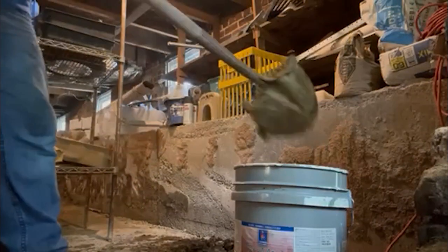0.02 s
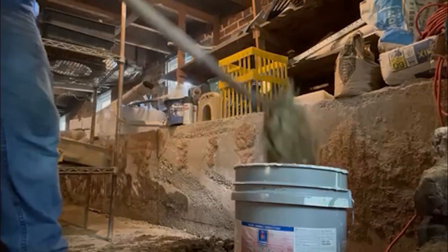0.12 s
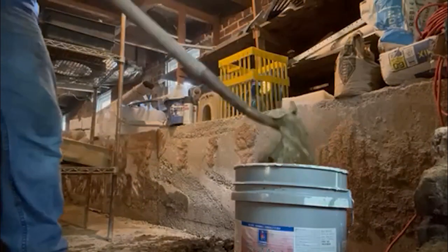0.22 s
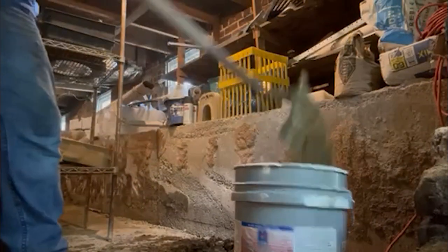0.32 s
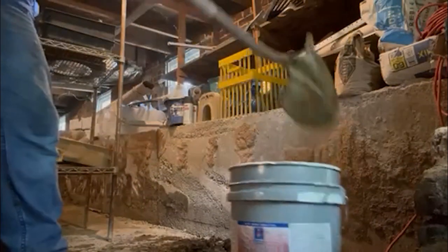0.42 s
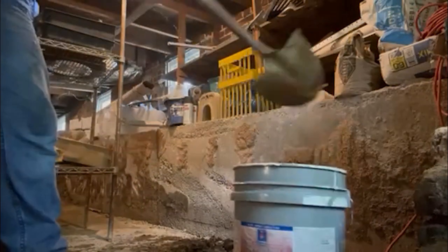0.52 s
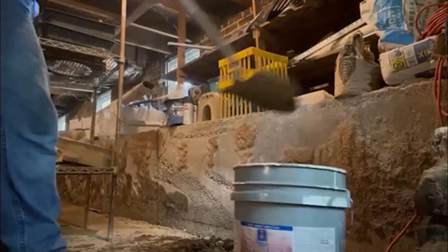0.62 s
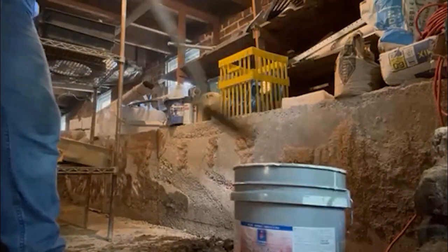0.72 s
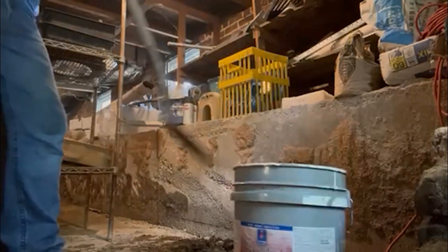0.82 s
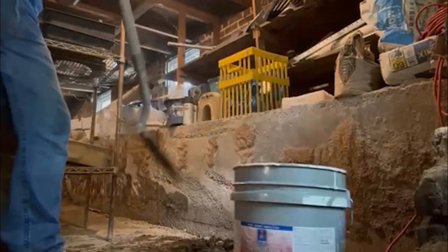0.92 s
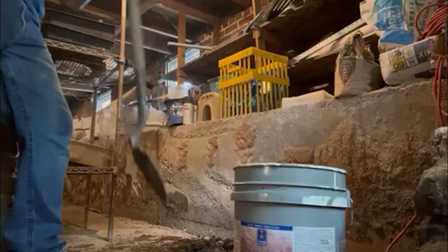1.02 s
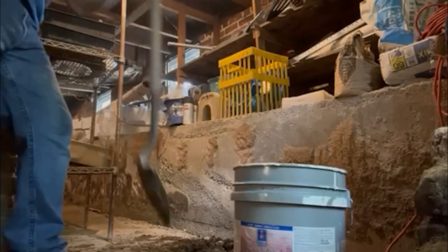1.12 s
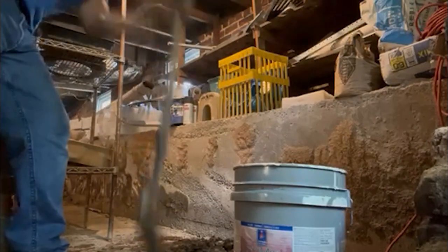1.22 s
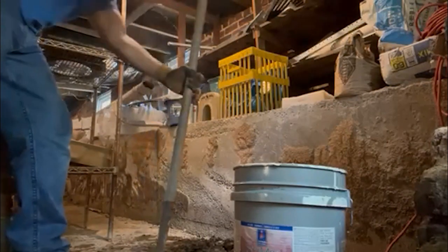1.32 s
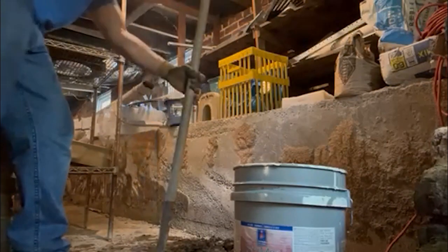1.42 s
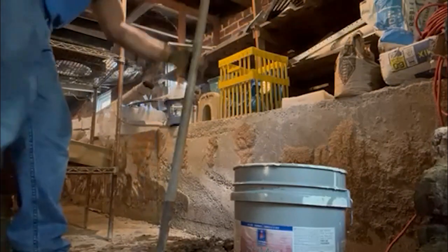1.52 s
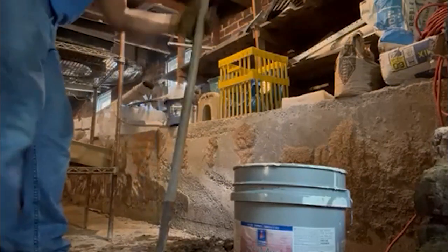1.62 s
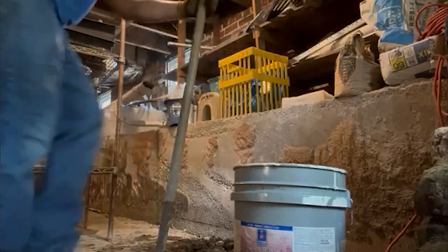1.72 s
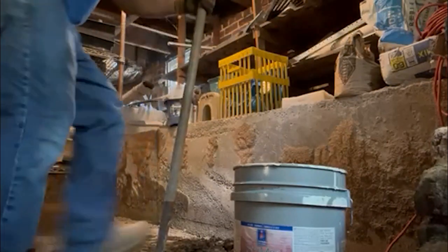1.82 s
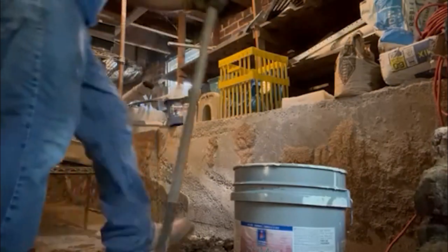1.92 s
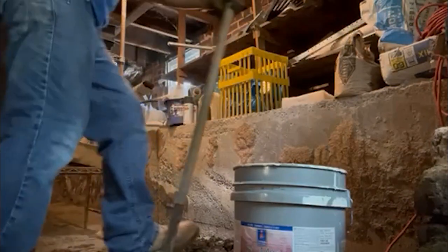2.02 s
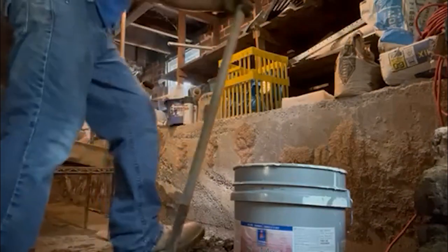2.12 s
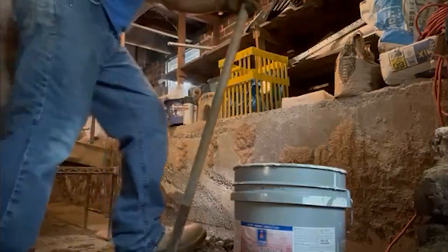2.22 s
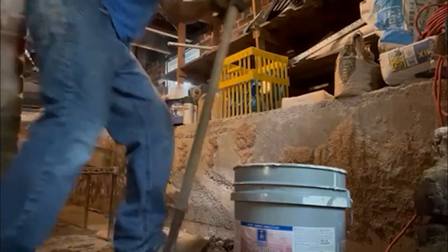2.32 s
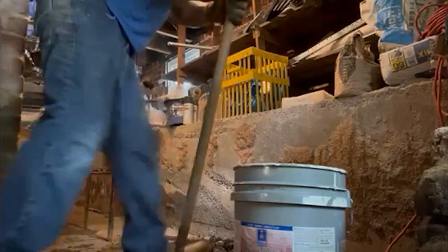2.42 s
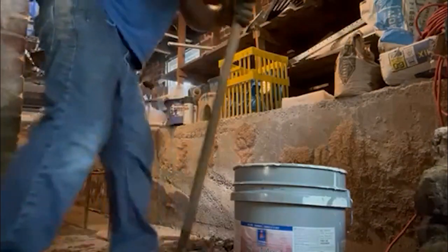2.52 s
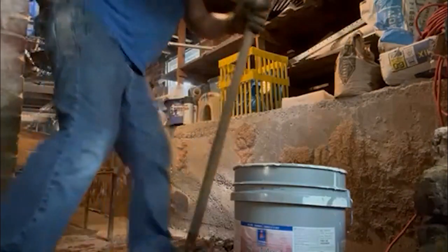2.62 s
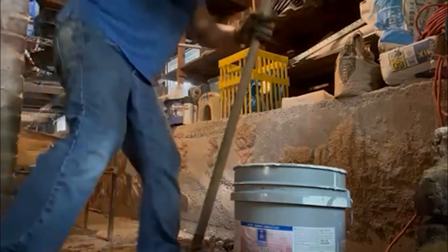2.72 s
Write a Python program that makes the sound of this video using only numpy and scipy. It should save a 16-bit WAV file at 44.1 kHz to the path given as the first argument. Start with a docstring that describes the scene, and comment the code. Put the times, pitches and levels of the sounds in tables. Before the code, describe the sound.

Rubble falls into a plastic pail: after faint ticks, a dense, loud, hollow tumble at 0.23-0.35 s, gravel trickling, and a last soft thump at 0.53. Near quiet until 1.26, when a shovel blade stabs dirt with a sharp stony crunch. Faint boot thuds at 1.63 and 1.89; gritty scraping and knocks from 2.27, a short hard crunch at 2.46, then fading crumbs. Close, short basement reverberation, faint low hum.

```python
"""Rubble into a pail

Basement with a dirt floor, two close microphone ports. A shovelful of rubble drops into a plastic pail,
heard as dying modes of its air and wall; the steel blade is stabbed into the floor, boots step up and
push it through gravel: short detuned rings for thuds and knocks, random ticks for grit, small clacks
for gravel. Scattered reflections give the room; shaped noise gives its air and a low wavering hum."""
import sys
import numpy as np
from scipy import signal
from scipy.fft import rfft, irfft, next_fast_len
from scipy.io import wavfile
from scipy.ndimage import uniform_filter1d

SR = 44100
rng = np.random.default_rng(int(sys.argv[2]) if len(sys.argv) > 2 else 0)


def attenuation_scalar(level_db):
    """Turn a level in dB into a linear amplitude multiplier (20 dB per decade)."""
    decades = np.asarray(level_db, float) / 20
    return 10 ** decades


def persist_wave(psi):
    """Save psi, clipped to +-1, as 16-bit WAV."""
    counts = np.round(np.clip(psi, -1, 1) * 32767).astype(np.int16)
    wavfile.write(sys.argv[1], SR, np.atleast_2d(counts).T)


N = 121275  # samples

# Lumps landing in the pail: t/s, relative level/dB, hardness/0-1
LUMPS = [(.234, -8.5, 0.71), (.243, -3.5, 0.64), (.254, -1, 0.4), (.268, -2.5, .6), (.288, -6.5, 0.7),
         (.308, -2, 0.45), (.323, -4, 0.5), (0.349, -14, 0), (.383, -24.5, 0.81), (.519, -14.5, 0.31),
         (0.532, -9.5, 0)]
# Modes of the pail, its air first, then its wall: f/Hz, relative level/dB, t60/s
PAIL_MODES = [(215.5, -6.5, 0.38), (208.3, 0, 0.063), (272, -6.5, 0.091), (407.3, -10, 0.051),
              (665, -15, 0.078), (962, -25.5, 0.1), (1900, -12, 0.034)]
# Dull blows of blade and boots on the dirt floor: t/s, main mode level/dB, f/Hz, t60/s
THUDS = [(.155, -22, 121, 0.091), (1.262, -22, 248, 0.051), (1.272, -15, 79.4, 0.23),
         (1.625, -24.5, 186.4, 0.073), (1.647, -28, 178, 0.035), (1.665, -34, 70.5, 0.24),
         (1.886, -22, 218.4, 0.12), (1.892, -15.5, 109, 0.071), (2.461, -13.5, 167, 0.079),
         (2.484, -17.5, 192, 0.13)]
# Stones knocking the blade or each other: t/s, main mode level/dB, f/Hz
KNOCKS = [(.022, -29, 957), (.023, -32.5, 467), (0.121, -43, 990), (0.191, -41, 1040), (.243, -9.5, 741),
          (.447, -35, 630), (1.259, -17, 713), (1.273, -11, 847), (1.275, -13.5, 3370), (1.643, -40.5, 483),
          (1.932, -36, 1056), (2.272, -30.5, 633), (2.284, -28.5, 1820), (2.308, -26.5, 643),
          (2.35, -15, 1000), (2.36, -14.5, 621), (2.401, -26, 701), (2.463, -23.5, 1905),
          (2.461, -26.5, 924), (2.462, -22, 478), (2.611, -39.5, 1780), (2.677, -38.5, 603)]
# Loose material jolted by a blow, sudden and dying: t/s, fine grit level/dB, coarse gravel level/dB, t60/s
SPILLS = [(0.018, -65, -33, 0.17), (0.04, -38.5, -53, 0.046), (0.144, -59, -37, 0.24),
          (0.249, -39, -21, 0.48), (0.517, -55, -46.5, 0.7), (1.258, -27.5, -14, 0.11),
          (1.273, -17, -29, 0.13), (1.627, -58, -52.5, 0.45), (1.748, -83, -40.5, 0.07),
          (1.883, -55.5, -37, 0.25), (2.24, -41, -37.5, 0.31), (2.312, -35.5, -38, 0.17),
          (2.332, -24, -29.5, 0.2), (2.458, -52, -11, 0.039)]
# Loose material dragged or pouring, swelling and fading:
# start t/s, length/s, fine grit level/dB, coarse gravel level/dB
DRAGS = [(0.119, 0.17, -55.5, -42), (0.302, 0.44, -90, -55.5), (.9, .18, -60, -73.5),
         (1.882, .14, -57, -49.5), (2.015, 0.3, -67, -62), (1.233, 0.096, -55.5, -43.5),
         (2.275, 0.2, -40, -29.5), (2.394, 0.41, -52.5, -43.5), (2.644, 0.067, -50, -40.5)]
# Colour of the fine grit: f/Hz, relative level/dB
GRIT_COLOUR = [(1000, -5), (1800, -1), (4500, -7.5), (8500, -6.5), (11500, -11)]
# Colour of the coarse gravel, by pitch of stone: f/Hz, relative level/dB
GRAVEL_COLOUR = [(200, -3.5), (600, 6), (1100, -0.5), (2000, -8.5), (3000, -19.5), (6000, -32)]
# Colour of the basement air: f/Hz, relative level/dB
AIR_COLOUR = [(25, -8.5), (120, -6.5), (185, -20), (260, -16.5), (470, -32), (1290, -41), (4280, -47),
              (11500, -51.5)]
# Decay of the room: f/Hz, t60/s
ROOM_DECAY = [(100, 0.29), (9000, 0.22)]
# Likeness of the two channels: f/Hz, likeness/0-1
LIKENESS = [(250, 0.98), (600, 0.098), (1500, .58), (4000, 0.35), (6200, 0.62)]
# Phase between the microphone ports: f/Hz, left lead/rad
PORT_PHASE = [(7500, 0), (8100, .6), (8900, np.pi), (9800, np.pi), (10800, 2 * np.pi)]
# Balance of the microphone ports: f/Hz, left minus right/dB
PORT_BALANCE = [(150, 2), (600, -3.5), (2500, 1)]

PAIL_DB, WALL_SCATTER = -6, 0.082  # scatter: relative pitch spread of the wall modes
CHOKE_DB_PER_S = 354.5  # extra decay of a ring once the next lump has landed
KNOCK_T60_CYCLES, STONE_T60_CYCLES = 45, 16.4
THUD_RISE_CYCLES = 0.26  # how slowly soft dirt takes a blow
SPILL_RISE_S = 0.0055
CRUMBLE_DB, CRUMBLE_T60_S = -16, 0.087  # gravel shed by a lump of hardness 0.5, relative to the lump
CLUMP_DB, CLUMP_S = 1.5, 0.01  # rms unevenness of the gravel, length of its smoothing
GRIT_PER_S, GRIT_SPREAD_DB = 8000, 1  # per channel
GRAVEL_PER_S, GRAVEL_SPREAD_DB = 1500, 2.5
ROOM_DB, AIR_DB = -9, -48.5
HUM_HZ, HUM_WIDTH_HZ, HUM_DB = 106, 16, -49.5
TWIN_HZ = 7000  # above this the two channels are alike
OVERLOAD = 1.1  # full-scale units; the input stage rounds off peaks near this level
LOW_CUT_HZ, TOP_HZ = 57.4, 11750
BASS_LAG_S, LAG_SLOPE = 0.005, 0.88  # delay at 200 Hz, exponent of its growth towards the bass


def pail():
    """The air in the pail rings alike for every lump; wall modes change with the spot; soft lumps lose the top."""
    out = np.zeros(N)
    t = np.arange(SR // 2) / SR
    spots = rng.standard_normal((len(LUMPS), len(PAIL_MODES), 2))
    spots[:, :2] = 0  # the two air modes stay put
    gaps = np.diff([row[0] for row in LUMPS] + [N / SR])
    for (s, db, hard), spot, gap in zip(LUMPS, spots, gaps):
        choke = attenuation_scalar(-CHOKE_DB_PER_S * np.maximum(t - gap, 0))
        for (hz, mode_db, t60), (level_shift, pitch_shift) in zip(PAIL_MODES, spot):
            hardness_db = 12 * (hard - 0.5) * np.log2(hz / PAIL_MODES[0][0])
            level_db = db + PAIL_DB + mode_db + hardness_db + 3 * level_shift
            add(out, s, choke * ring(hz * (1 + WALL_SCATTER * pitch_shift), level_db, t60))
    return coloured(out, lambda hz: 1 / (1 + (140 / (hz + 1)) ** 4))


def thuds():
    """Blade and boots strike the dirt floor, whose softness rounds the attack."""
    return blows(THUDS, smear=0.26, rise_cycles=THUD_RISE_CYCLES)


def knocks():
    """Stones knock with a sharp attack and ring for a fixed number of cycles."""
    table = [(s, db, hz, KNOCK_T60_CYCLES / hz) for s, db, hz in KNOCKS]
    return blows(table, smear=0.17)


def blows(table, smear, rise_cycles=0):
    """Short rings, each a main mode with two weaker, faster-dying detuned neighbours."""
    out = np.zeros(N)
    t = np.arange(SR // 2) / SR
    detunings = rng.uniform(0.62, 1, (len(table), 2))
    for (s, db, hz, t60), (up, down) in zip(table, detunings):
        modes = ring(hz, db, t60)
        modes += ring(hz * (1 + smear * up), db - 9, t60 / 2)
        modes += ring(hz * (1 - smear * down), db - 10.5, t60 / 2)
        rise = np.minimum(t * hz / max(rise_cycles, 1 / SR), 1)
        add(out, s, modes * np.sin(np.pi / 2 * rise) ** 2)
    return out


def slide():
    """Fine grit hisses along the blade, coarse gravel crunches."""
    fine, coarse = motion()
    grit = grains(GRIT_PER_S, GRIT_SPREAD_DB, GRIT_COLOUR)
    gravel = stones()
    hiss = fine * grit / band_rms(grit, 3000, 8500)
    crunch = coarse * gravel / band_rms(gravel, 500, 2500)
    return hiss + crunch


def motion():
    """Strength of grit and gravel over time: powers of spills, drags and crumbling lumps add up."""
    t, power = np.arange(N) / SR, np.zeros((2, N))
    for s, grit_db, gravel_db, t60 in SPILLS:
        since = np.maximum(t - s, 0)
        decay = attenuation_scalar(np.array([[grit_db], [gravel_db]]) - 60 * since / t60)
        power += (decay * np.minimum(since / SPILL_RISE_S, 1)) ** 2
    for s, length, grit_db, gravel_db in DRAGS:
        swell = np.sin(np.pi * np.clip((t - s) / length, 0, 1))
        power += (attenuation_scalar(np.array([[grit_db], [gravel_db]])) * swell) ** 2
    for s, db, hard in LUMPS:  # hard lumps shed the most gravel
        decay = attenuation_scalar(db + CRUMBLE_DB - 60 * np.maximum(t - s, 0) / CRUMBLE_T60_S)
        power[1] += (t > s) * (2 * hard * decay) ** 2
    clumps = evened(uniform_filter1d(rng.standard_normal(N), round(CLUMP_S * SR)))
    return np.sqrt(power) * attenuation_scalar(CLUMP_DB * clumps * np.array([[0.8], [1]]))  # grit clumps less


def grains(per_s, spread_db, spectrum):
    """Random ticks of uneven size with the given colour, scattered left and right."""
    size = attenuation_scalar(spread_db * np.minimum(rng.exponential(1, (2, N)), 5))
    size = size * rng.choice([-1., 1.], (2, N))
    ticks = paired(*(size * (rng.random((2, N)) < per_s / SR)))
    return coloured(ticks, lambda hz: attenuation_scalar(read(spectrum, hz)))


def stones(count=24):
    """Each stone gives a short clack at one of count pitches, left or right."""
    size = attenuation_scalar(GRAVEL_SPREAD_DB * np.minimum(rng.exponential(1, (2, N)), 4))
    size = size * (rng.random((2, N)) < GRAVEL_PER_S / SR)
    kind, out = rng.integers(0, count, (2, N)), np.zeros((2, N))
    for k, hz in enumerate(np.geomspace(GRAVEL_COLOUR[0][0], GRAVEL_COLOUR[-1][0], count)):
        clack = ring(hz, read(GRAVEL_COLOUR, hz), STONE_T60_CYCLES / hz)[:4096]
        out += signal.oaconvolve(size * (kind == k), clack[None] * hz, axes=1)[:, :N]
    return paired(*out)


def room(x):
    """Scattered reflections, each band dying at its own speed."""
    taps = np.zeros((2, SR // 2))
    starts = np.arange(200, SR // 2 - 20, 20)  # one reflection in every 20 samples
    at = starts + rng.integers(0, 20, (2, len(starts)))
    np.put_along_axis(taps, at, rng.choice([-1., 1.], at.shape), 1)
    hz, t, bands = signal.stft(taps, SR, nperseg=256)
    decay = attenuation_scalar(-60 * t / read(ROOM_DECAY, hz)[:, None])
    tail = signal.istft(bands * decay, SR, nperseg=256)[1]
    tail = tail / np.linalg.norm(tail[0])
    return paired(*signal.fftconvolve(x[None], tail, axes=1)[:, :N])


def basement_air():
    """A soft broadband floor, and a wavering hum made of narrow-band noise, equal in both channels."""
    a, b, c = rng.standard_normal((3, N))
    hum = coloured(c, lambda hz: 1 / (1 + (2 * (hz - HUM_HZ) / HUM_WIDTH_HZ) ** 2))
    air = coloured(paired(a, b), lambda hz: attenuation_scalar(read(AIR_COLOUR, hz)))
    return attenuation_scalar(AIR_DB) * evened(air) + attenuation_scalar(HUM_DB) * evened(hum)


def ring(hz, db, t60):
    """One dying mode, half a second long; t60 is at least 10 ms."""
    t = np.arange(SR // 2) / SR
    return attenuation_scalar(db - 60 * t / max(t60, 0.01)) * np.sin(2 * np.pi * hz * t)


def paired(a, b):
    """Two channels that are alike in the bass and the top treble and differ between."""
    def like(hz):
        return np.where(hz > TWIN_HZ, 1, np.clip(read(LIKENESS, hz), 0, 1))

    right = coloured(a, like) + coloured(b, lambda hz: np.sqrt(1 - like(hz) ** 2))
    return np.array([a, right])


def add(mix, s, sound):
    """Mixes a sound in at a time in seconds."""
    part = mix[round(s * SR):][:len(sound)]
    part += sound[:len(part)]


def evened(x):
    """Scales to rms 1."""
    return x / np.sqrt(np.mean(x ** 2) + 1e-20)


def read(points, hz):
    """Reads a table on a log-frequency axis."""
    f, value = np.transpose(points)
    return np.interp(np.log(hz + 1), np.log(f + 1), value)


def coloured(x, gain):
    """Filters by a complex gain given as a function of Hz."""
    size = next_fast_len(N + 8192)
    return irfft(rfft(x, size) * gain(np.fft.rfftfreq(size, 1 / SR)), size)[..., :N]


def band_rms(x, lo_hz, hi_hz):
    """Level inside a band."""
    return np.std(coloured(x, lambda hz: (hz > lo_hz) & (hz < hi_hz)))


def scene():
    """All sources in the basement; blows in the centre, loose material spread wide."""
    struck = pail() + thuds() + knocks()
    loose = slide()
    reflections = attenuation_scalar(ROOM_DB) * room(struck + loose[0])
    return struck + loose + reflections + basement_air()


def band_limit(x):
    """A steep low-pass at the top of the band."""
    return signal.sosfilt(signal.butter(12, 12870, fs=SR, output="sos"), x)


def record(dry):
    """Soft overload and band limits; the bass arrives late; the two ports differ in phase and level."""
    side = np.array([[0.5], [-0.5]])  # each port takes half of the difference

    def lag(hz):  # phase in rad, the integral of the delay over frequency
        power = 1 - LAG_SLOPE
        return 2 * np.pi * BASS_LAG_S * 200 * (hz / 200) ** power / power

    def ports(hz):
        low_cut = 1 / np.sqrt(1 + (LOW_CUT_HZ / (hz + 1)) ** 4)
        top_cut = 1 / (1 + (hz / TOP_HZ) ** 60)
        balance = attenuation_scalar(side * read(PORT_BALANCE, hz))
        phase = side * read(PORT_PHASE, hz) - lag(hz)
        return low_cut * top_cut * balance * np.exp(1j * phase)

    rounded = OVERLOAD * np.tanh(dry / OVERLOAD)
    return band_limit(coloured(rounded, ports))


dry = scene()
out = record(dry)
persist_wave(out)
```